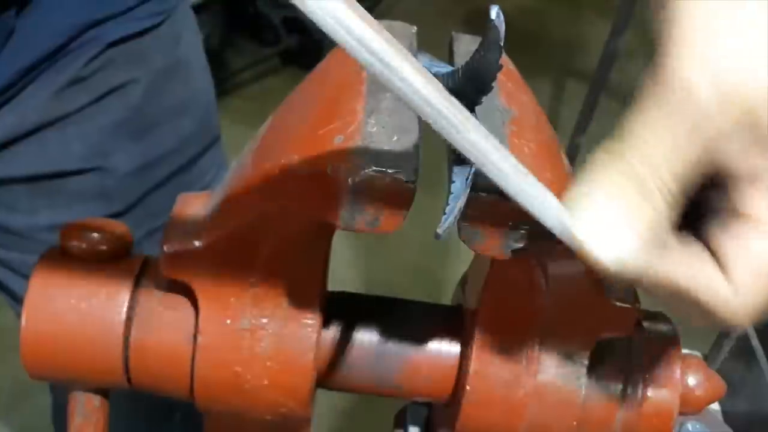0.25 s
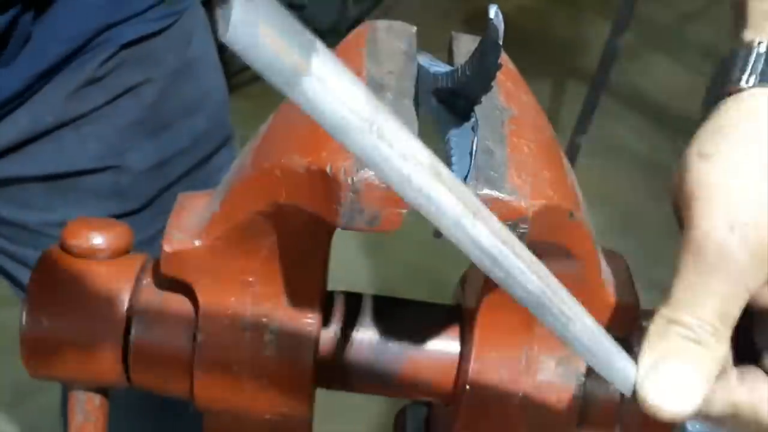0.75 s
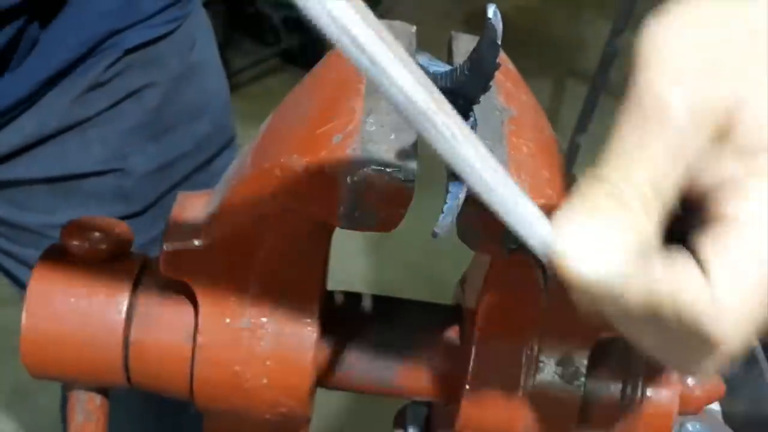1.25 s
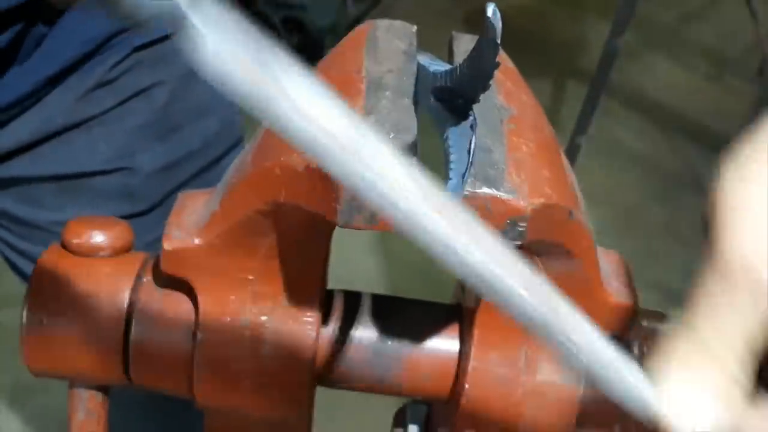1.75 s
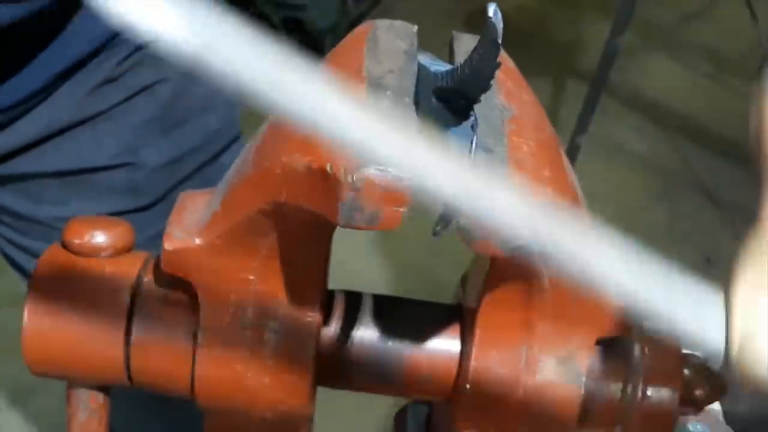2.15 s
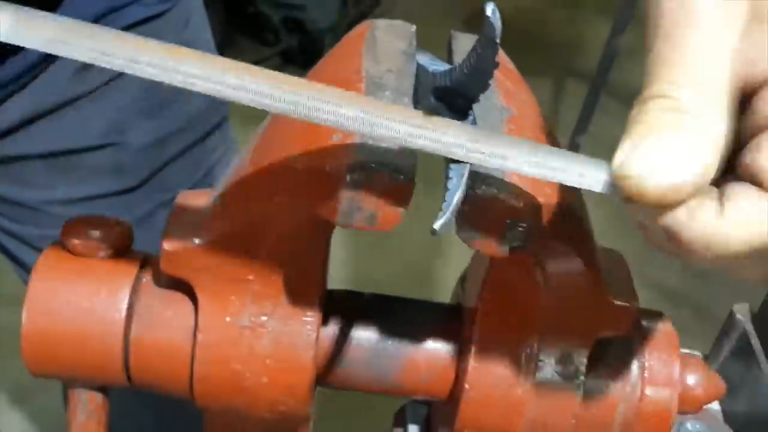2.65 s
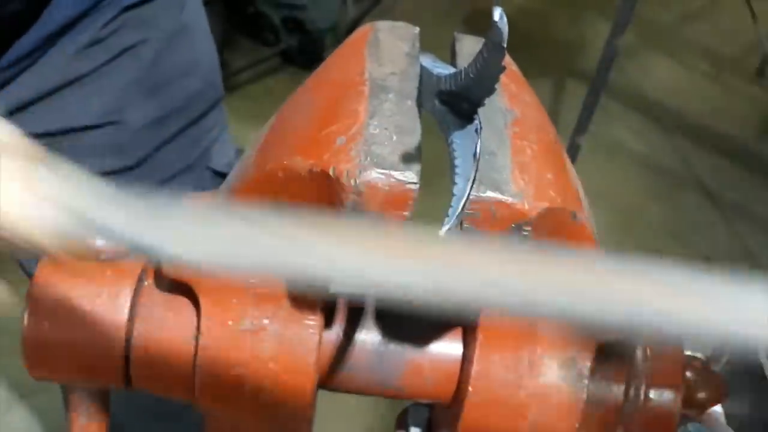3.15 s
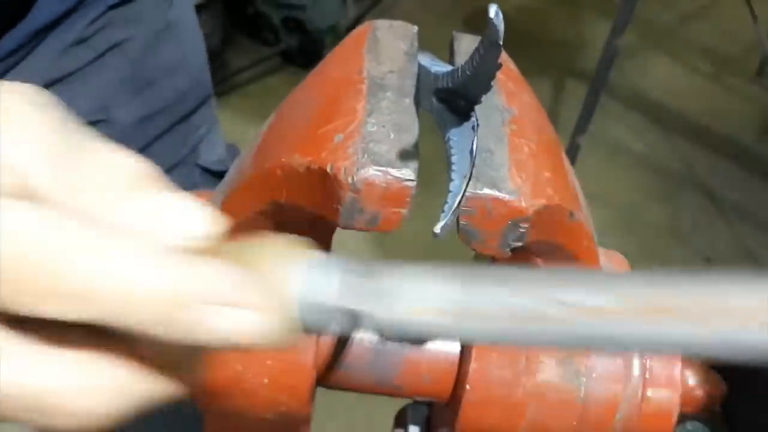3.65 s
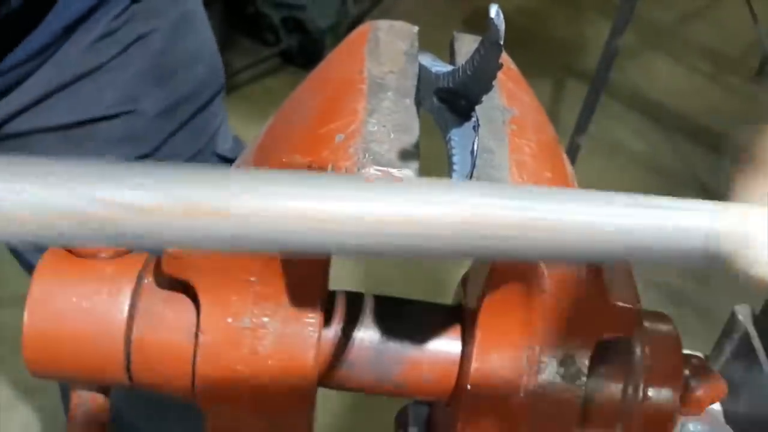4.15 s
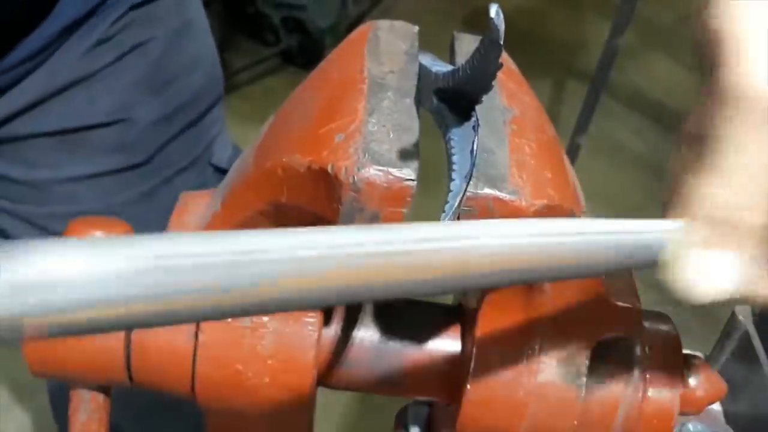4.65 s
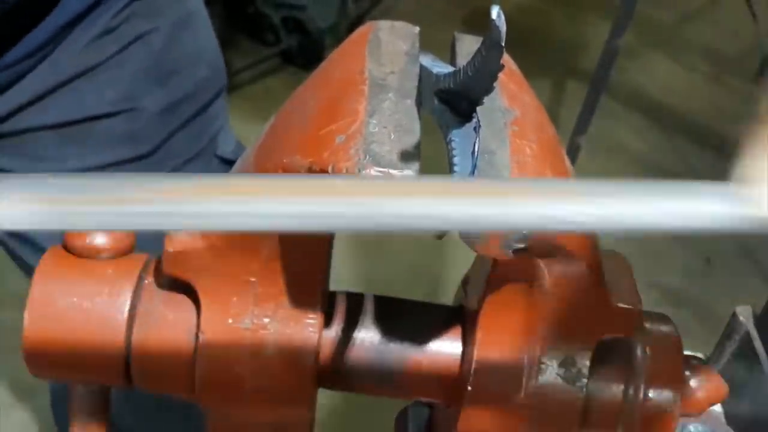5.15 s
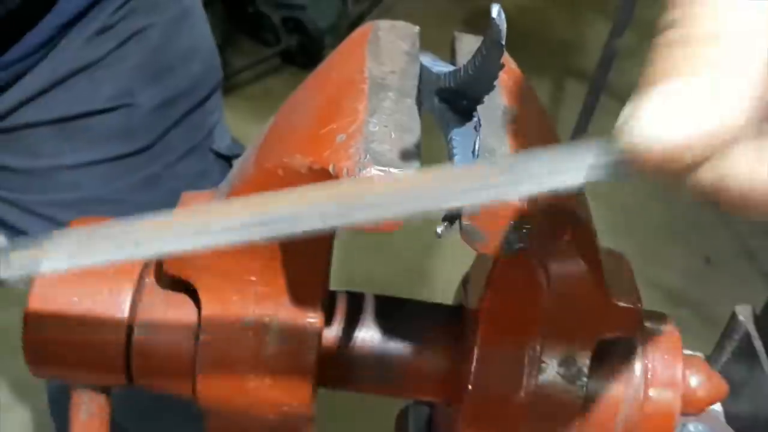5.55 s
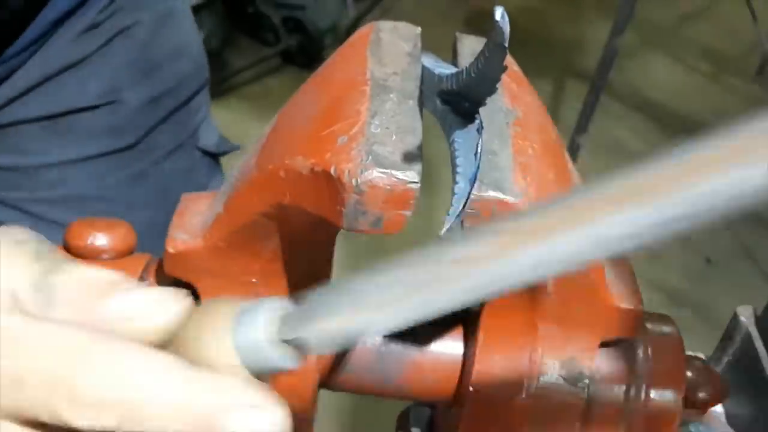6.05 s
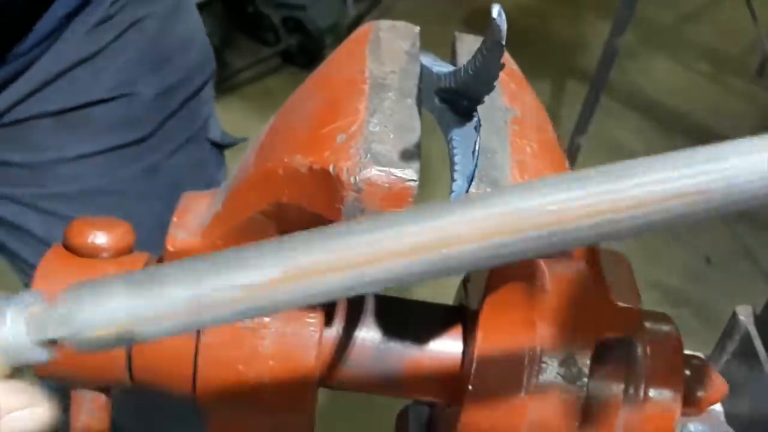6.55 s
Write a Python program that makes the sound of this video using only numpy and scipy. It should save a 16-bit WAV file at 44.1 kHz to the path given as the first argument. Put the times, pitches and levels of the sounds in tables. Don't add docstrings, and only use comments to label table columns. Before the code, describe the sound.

Close, dry workshop sound of a round metal file on a small iron piece in a bench vise, over faint low ventilation hum. From 0.1 to 2 s, a tap and then six strong, gritty forward strokes, peaking near 0.27, 0.64, 0.96, 1.3, 1.6 and 1.93 s, with weaker return scrapes between; bright midrange rasp, ringing chatter and a hard clack at 1.27. From 2.2 to 2.8 s only a tap and faint light scrapes. Thin, piercing squeals near 8 kHz follow at 3.1, 3.5 and 3.9 s, with ticks and soft air thuds. A coarse rasp comes at 4.25, a sharp clack at 4.6, a shorter rasp at 4.9. Another squeal at 5.25; at 5.6 squeal breaks into a loud nasal buzz. A squeal at 5.95, then hissing, buzzing strokes at 6.3 and 6.6 s, the last held longest, fading into short metallic ringing.

```python
import sys
import numpy as np
from scipy import signal
from scipy.fft import rfft, irfft
from scipy.io import wavfile
from scipy.ndimage import uniform_filter1d

SR = 44100
rng = np.random.default_rng(int(sys.argv[2]) if len(sys.argv) > 2 else 0)


def decibels_to_gain(level_db):
    exponent = np.asarray(level_db, float) / 20
    return 10 ** exponent


def digitize_waveform(pressure):
    field = np.atleast_2d(pressure).T
    bounded = np.clip(field, -1, 1)
    quanta = np.round(bounded * 32767).astype(np.int16)
    wavfile.write(sys.argv[1], SR, quanta)


N = 299439

# frequency in Hz, density in dB per Hz.
RASP_SPECTRUM = [(290, -121), (500, -18), (1300, -15.5), (1430, -8), (1780, -4.5), (2940, -9), (3620, 4),
                 (6910, -2.5), (8280, -1.5), (11000, -45), (14300, -59.5), (22000, -120)]


def rms_one(x):
    return x / np.sqrt(np.mean(x ** 2) + 1e-20)


def drift(rate):
    r = np.exp(-2 * np.pi * rate / SR)
    return rms_one(signal.lfilter([1], [1, -2 * r, r * r], rng.standard_normal(N + SR))[SR:])


def coloured(x, spectrum):
    hz = np.fft.rfftfreq(N, 1 / SR) + 1
    points = np.array(spectrum)
    density_db = np.interp(np.log(hz), np.log(points[:, 0]), points[:, 1])
    return rms_one(irfft(rfft(x) * decibels_to_gain(density_db), N))


def resonance(x, hz, width):
    r = np.exp(-np.pi * width / SR)
    return signal.lfilter([(1 - r * r) / 2, 0, (r * r - 1) / 2], [1, -2 * r * np.cos(2 * np.pi * hz / SR), r * r], x)


def bandpass(x, low_hz, high_hz):
    return signal.sosfilt(signal.butter(2, [low_hz, high_hz], "band", fs=SR, output="sos"), x)


def band(x, low_hz, high_hz):
    return rms_one(bandpass(x, low_hz, high_hz))


def steep_band(x, low_hz, high_hz):
    return band(band(x, low_hz, high_hz), low_hz, high_hz)


def tone(hz, level_db, wobble_db, rate):
    return np.sqrt(2) * decibels_to_gain(level_db + wobble_db * drift(rate)) * np.sin(2 * np.pi * np.cumsum(hz) / SR)


def control_times():
    step = 32
    return np.arange(0, N + step, step) / SR


def smooth(control):
    return np.interp(np.arange(N) / SR, control_times(), control)


def shape_db(s, held_s, rise_s, fall_db_s):
    late = control_times() - np.reshape(s, (-1, 1))
    rise_db = -30 * (np.minimum(late, 0) / rise_s) ** 2
    return rise_db - fall_db_s * np.maximum(late - np.reshape(held_s, (-1, 1)), 0)


def let_go_db(s, held_s, drop_db, drop_s):
    return np.maximum(shape_db(s, held_s, np.inf, drop_db / drop_s), -drop_db)


def lead(rows, under_db):
    hz, one_db, two_db = np.transpose(rows)[2:]
    top = np.argmax(under_db + np.maximum(one_db, two_db)[:, None], axis=0)
    down_db = np.maximum(under_db[top, np.arange(len(top))], -150)
    return smooth(hz[top]), smooth(one_db[top] + down_db), smooth(two_db[top] + down_db)


def split(x, edge_hz):
    low = 1 / (1 + (np.fft.rfftfreq(N, 1 / SR) / edge_hz) ** 8)
    return [rms_one(irfft(rfft(x) * share, N)) for share in (low, 1 - low)]


def patchy(x, edges_hz):
    total = np.zeros(N)
    for low_hz, high_hz in zip(edges_hz, edges_hz[1:]):
        total += decibels_to_gain(1.6 * drift(18)) * bandpass(x, low_hz, high_hz)
    return rms_one(total)


def rung(drive, modes, least_width, swell_rate):
    total = np.zeros(N)
    for k, (hz, width, db) in enumerate(modes):
        width = max(width, least_width)
        swell = decibels_to_gain(3.8 * np.minimum(drift(swell_rate), 1.4))
        total += (-1) ** k * swell * decibels_to_gain(db) * resonance(drive, hz, width) * np.sqrt(SR / width)
    return total


def shop_hum():
    # frequency in Hz, density in dB per Hz.
    shop_spectrum = [(15, -60), (40, -26.5), (100, -9.5), (228, 2), (320, -3), (440, -16), (1980, -25.5),
                     (3300, -21.5), (3980, -17), (5650, -27), (12500, -37), (14600, -32), (15800, -29)]
    air = rng.standard_normal(N)
    rumble = decibels_to_gain(-43 + 0.13 * drift(1.2)) * coloured(air, shop_spectrum)
    fan = decibels_to_gain(-52.5) * rms_one(resonance(air[::-1], 225, 27))
    vise_hum = tone(np.full(N, 734), -70.5, 4.3, 9.9)
    return rumble + fan + vise_hum


def taps():
    # start in seconds, peak in dB, ring in Hz.
    touches = [(0.1038, -7, 4050), (0.5152, -24, 4700), (0.592, -25, 4900), (1.274, 8.5, 4930),
               (3.506, -16, 5140), (5.567, -21.5, 4890), (5.927, -30, 3816), (2.228, -7.5, 3750),
               (3.476, -13, 3560), (3.8395, -6.5, 4970), (4.1861, -14, 4880), (4.4784, -23, 4000),
               (4.614, 5, 3950), (4.843, -11.5, 5070), (5.18, -28, 4756), (6.489, -21, 4170)]
    out = np.zeros(N)
    t = np.arange(2000) / SR
    cracks = coloured(rng.standard_normal(N), RASP_SPECTRUM)
    for s, db, hz in touches:
        at = round(s * SR)
        crack = cracks[at:at + 2000] * np.exp(-t / 0.0017)
        ring = np.sin(2 * np.pi * hz * t) * np.exp(-t / .003)
        out[at:at + 2000] += decibels_to_gain(db) * (0.095 * crack + 0.34 * ring)
    return out


def pressure():
    # full at in seconds, held in seconds, bite in dB,
    # then dull rasp and filings hiss in dB relative to the bite.
    pushes = [(0.267, 0.059, -11.5, -4.5, -14), (0.639, 0.038, -9.5, -5, -11.5),
              (0.964, 0.044, -11.5, -9, -7.5), (1.294, 0.049, -11.5, -7, -10),
              (1.606, 0.056, -9.5, -10.5, -12.5), (1.924, 0.064, -13.5, -6, -8), (2.71, 0.018, -34, -5, -5),
              (2.758, 0.033, -27.5, 0.5, -1.5), (4.244, 0.061, -12.5, -0.5, -11),
              (4.909, 0.054, -18.5, -5, -14), (5.63, 0.07, -19, -6, 3), (6.272, 0.05, -19, -5.5, -2),
              (6.574, 0.082, -17.5, -1, 5)]
    returns = [(0.201, 0.026, -32.5, -3.5, -35), (0.447, 0.047, -23.5, -8, -42),
               (.525, 0.0093, -31.5, -32, -35), (0.808, 0.045, -17.5, -16.5, -38),
               (1.132, 0.038, -20.5, -13, -29), (1.47, 0.022, -16.5, -23, -22),
               (1.785, 0.032, -21, -10.5, -29), (2.339, 0.05, -30.5, -9, -13),
               (2.514, 0.11, -34.5, -2, -10)]
    catches = [(.105, 0.057, -35.5, -26, -40), (0.592, 0.014, -16, -23, -35),
               (2.229, 0.0043, -30.5, -29, -32), (2.396, 0.033, -25.5, -5, -8.5),
               (4.187, 0.016, -92.5, -38, -35), (4.614, 0.005, -15, -5.5, -19),
               (4.843, 0.011, -72.5, -9, -17), (6.489, 0.012, -21.5, -9, -15)]
    skids = [(3.071, 0.08, -34.5, 4.9, 6.7), (3.466, 0.078, -35.5, 5, 11.8), (3.837, 0.074, -32, 3.3, 16),
             (5.181, 0.13, -34.5, 6.9, 11.4), (5.566, 0.034, -39, 6.6, 7.2),
             (5.928, 0.079, -31.5, 4.4, 11.5)]
    # strokes, rise in s, fall in dB/s, vise ring in dB, brightness lost away from top speed in dB/s,
    # top speed as share of hold, share that rings the iron in dB, even scrape in dB under the bite.
    kinds = [(pushes, .046, 244, -6, 74.5, 3.5, 0, -12),
             (returns, .036, 400, 2.2, 46, 0.67, 0, -9),
             (catches, .003, 243, 0.92, 21, 6.2, -2, -9),
             (skids, .005, 97, -2, 221.5, 1.23, -12, -0.5)]
    dullest_db, dull_follows = -46, 0.61
    gains = 0
    for rows, rise_s, fall_db_s, vise_db, dimming, share, ringing_db, even_db in kinds:
        s, held_s, bite_db, dull_db, hiss_db = np.transpose(rows)[:, :, None]
        bite = decibels_to_gain(bite_db + shape_db(s, held_s, rise_s, fall_db_s))
        slow_db = np.maximum(-dimming * np.abs(control_times() - s - share * held_s), dullest_db)
        layers_db = [ringing_db, dull_db + dull_follows * slow_db, hiss_db + slow_db, vise_db, even_db]
        gains = gains + np.sum([bite * decibels_to_gain(db) for db in layers_db], axis=1)
    return [smooth(gain) for gain in gains]


def snags():
    # start in seconds, peak in dB, ring in Hz, extra pressure in dB.
    bursts = [(0.254, -1, 4840, -6), (0.27, 5.5, 4610, 3), (0.3324, 3, 4970, 1), (0.443, 0.5, 3930, 8),
              (0.515, -4, 4300, -2), (0.5234, -5, 4470, 6), (0.617, 6, 4010, 4), (0.6348, 7.5, 4300, -3),
              (0.7976, -5, 3740, 1.5), (0.9264, -9, 4170, 4), (0.9502, -6, 4132, -1), (0.975, 0, 4030, 5),
              (1.119, -5, 5120, 0), (1.1434, -1, 3950, 9.5), (1.292, -12, 4150, 7), (1.4665, 1, 3880, 7.5),
              (1.578, -4, 4126, 0), (1.5936, -5, 4150, -6), (1.7906, -10, 3920, 3), (1.8973, -12, 4200, 1),
              (1.9086, -2, 3880, 0), (2.32, -16, 4470, 4.5), (3.5139, -9, 5020, 6), (3.5457, -10, 3190, 3),
              (4.222, 1.5, 4940, -12), (4.245, 5, 3860, -0.5), (4.2877, 7, 4840, 1), (4.3073, 3, 4780, 1),
              (4.8846, -14, 4343, -12), (4.903, -5.5, 4190, 1), (5.5933, -9, 3730, 2),
              (5.6261, -9, 3720, -2.5), (6.0033, -6, 4800, 4), (6.2219, -27, 3790, 13),
              (6.2477, -14, 3700, 1), (6.3044, -6, 3680, 2.5), (6.3537, -11, 3650, 7),
              (6.5086, -5.5, 4380, -4), (6.548, -9, 4280, 3.5), (6.31, 0, 3640, 4), (5.628, -7.5, 4880, 5),
              (5.715, -8, 4390, 8), (6.6194, -5, 3530, 9)]
    s, db, hz, push_db = np.transpose(bursts)[:, :, None]
    late = control_times() - s
    stall = -0.64 * np.exp(-np.abs(late) / 0.0016)
    surge = np.where(late > 0, np.exp(-np.abs(late) / 0.0098), stall)
    t = np.arange(3000) / SR
    notes = decibels_to_gain(db - 7.5) * np.sin(2 * np.pi * hz * t) * np.exp(-t / 0.0064) * np.minimum(t / .001, 1)
    rings = np.zeros(N + 3000)
    for at, note in zip((s[:, 0] * SR).astype(int), notes):
        rings[at:at + 3000] += note
    return decibels_to_gain(smooth(np.sum(push_db * surge, axis=0))), rings[:N]


def rasp():
    # frequency in Hz, width in Hz, level in dB.
    iron = [(3230, 27, -31), (3602, 47, 7.5), (3954, 150, 18), (4240, 100, 12.5), (4423, 33, 17),
            (4443, 460, 21.5), (4940, 310, 20.5), (5185, 20, 17), (5530, 290, 3), (5660, 77, -27.5),
            (6800, 200, -35), (8050, 40, -26), (12400, 51, -9), (8340, 137, -17)]
    vise_modes = [(743.8, 9, -6), (914.7, 30, -4), (1151.5, 16, -8), (1487.4, 14, 0), (2035, 12, -5),
                  (2230, 60, 1), (2443, 16, -3), (2740, 30, -4), (2908, 14, -6)]
    # frequency in Hz, density in dB per Hz.
    hiss_spectrum = [(8000, 9), (9500, 0), (11400, -14.5), (13500, -0.5), (15200, -8), (17000, -7)]
    # full at in seconds, level in dB.
    rubs = [(.3, -30), (.45, -37.5), (0.661, -14), (.8, -30), (1.0, -20.5), (1.13, -35), (1.303, -16.5),
            (1.47, -32), (1.6, -23), (1.93, -45), (2.39, -27), (2.601, -41), (4.26, -23.5), (4.625, -64),
            (4.921, -29.5), (6.572, -17)]
    bite, dull_gain, hiss_gain, vise_gain, even_gain = pressure()
    surge, rings = snags()

    sizes = decibels_to_gain(1.7 * np.minimum(rng.exponential(1, N), 4)) * rng.choice([-1, 1], N)
    struck = rng.random(N) < 5500 / SR
    bites = rms_one(sizes * struck * decibels_to_gain(3.0 * drift(110)))

    ringing = rms_one(rung(bites, iron, 110, 20.3))
    breaking = patchy(coloured(bites, RASP_SPECTRUM), np.geomspace(400, 12000, num=9))
    dull, middle = split(ringing + decibels_to_gain(-9.0) * breaking, 3220)
    filings = coloured(.6 * bites + rng.standard_normal(N), hiss_spectrum)
    hiss = patchy(filings, np.arange(8000, 18000, 1200))
    scrape = band(steep_band(rng.standard_normal(N), 3100, 5630), 3080, 5600)
    even = patchy(scrape, np.geomspace(2500, 6500, num=7))

    vise = rung(decibels_to_gain(-27.5) * vise_gain * bites, vise_modes, 5, 23)
    s, db = np.transpose(rubs)
    rub_gain = smooth(decibels_to_gain(db) @ decibels_to_gain(shape_db(s, 0.0059, 0.009, 251)))
    high = rms_one(resonance(bites, 8050, 140) - resonance(bites, 8310, 131)) * rub_gain
    return surge * (bite * middle + dull_gain * dull + hiss_gain * hiss + even_gain * even) + vise + high + rings


def file_ring():
    # frequency in Hz, width in Hz, level in dB.
    middle_modes = [(2950, 20, -12), (3140, 30, 0), (3680, 22, -4), (4010, 30, -1), (4250, 25, -5),
                    (4740, 25, 2), (5110, 25, -5), (5320, 25, -4), (6460, 40, -10)]
    top_modes = [(9320, 25, -4), (9500, 20, 4), (10100, 25, -5), (10480, 20, -10), (11400, 20, -7),
                 (11800, 25, -12), (12800, 30, -13), (14000, 35, -8), (14800, 45, -2)]
    _, _, hiss_gain, _, even_gain = pressure()
    scrape = rng.standard_normal(N)
    middle = rung(decibels_to_gain(-15) * even_gain * scrape, middle_modes, 5, 17.6)
    return middle + rung(decibels_to_gain(-19) * hiss_gain * scrape, top_modes, 5, 18)


def pings():
    # start in
    # seconds, held in seconds, frequency in Hz, level in dB, t60 in seconds.
    mode_pings = [(1.94, 0.025, 2830, -22.5, 0.11), (1.94, 0.017, 5660, -8, 0.13),
                  (1.94, 0.017, 7150, -25, 0.092), (2.236, 0.021, 2430, -48, .14),
                  (2.392, 0.06, 896, -44, 0.083), (2.41, .02, 9550, -45, 0.15),
                  (2.5, 0.14, 2222, -43.5, .4), (2.74, 0.059, 9600, -37.5, 0.31),
                  (2.78, 0.034, 1746, -39, 0.11), (3.16, 0.033, 9600, -47, 0.2),
                  (3.545, 0.018, 3240, -31, 0.1), (3.939, 0.016, 3994, -30, 0.14),
                  (3.95, 0.02, 3110, -37.5, 0.11), (4.219, .02, 3380, -26, 0.075),
                  (4.3, 0.024, 2205, -24, 0.11), (.69, 0.022, 4300, -22, 0.068),
                  (1.469, 0.021, 5530, -25.5, 0.059), (6.04, 0.014, 4800, -27, 0.2),
                  (4.45, 0.092, 1975, -55, .2), (4.31, 0.05, 1345, -34.5, .15), (.25, 0.019, 848, -31, .06),
                  (.285, 0.045, 1000, -37.5, .08), (.24, 0.08, 2500, -32.5, .1),
                  (.31, 0.053, 2057, -29, .1), (1.14, 0.074, 1990, -41, .1), (3.775, 0.021, 3550, -46, .04),
                  (3.775, 0.021, 1240, -50, .04), (6.32, 0.036, 3570, -19.5, .12),
                  (6.6, 0.069, 3560, -23, .12), (3.53, 0.042, 11400, -52, .2),
                  (3.87, 0.053, 15000, -31.5, .17), (3.94, 0.043, 11430, -50.5, .26),
                  (4.215, 0.074, 1710, -29.5, .1), (4.641, 0.047, 1328, -36, .15),
                  (5.33, 0.056, 9700, -49, 0.27), (3.54, .04, 9320, -46, .25), (3.55, .03, 10480, -52, .25),
                  (3.95, .03, 10150, -47, .2), (6.0, .06, 11500, -52, 0.17), (5.97, 0.09, 10270, -48, 0.25),
                  (5.99, 0.033, 15000, -32, 0.14), (6.0, 0.075, 3216, -37, 0.13),
                  (6.488, 0.024, 1350, -35, 0.17), (6.57, 0.11, 2220, -30, 0.047),
                  (1.2, .02, 6000, -36, .06), (0.36, 0.082, 2500, -40, .15), (1.1, 0.028, 3100, -39, .12),
                   (1.5, 0.024, 2600, -37, .12), (4.6, 0.027, 1450, -40, .05), (6.6, .02, 1800, -40, .05),
                   (0.75, 0.064, 1300, -43, 0.18), (1.459, 0.077, 1205, -45, 0.15),
                  (.44, 0.05, 1505, -44, .15), (.8, 0.11, 1497, -42, 0.19), (1.02, 0.047, 1420, -34, .12),
              (1.11, 0.099, 1510, -37, 0.13), (1.33, 0.043, 1415, -39.5, 0.16),
              (1.455, 0.087, 1520, -34.5, 0.22), (1.78, .07, 1505, -40.5, .15),
              (3.09, .03, 4000, -36.5, .1), (5.205, .02, 3220, -42, .05), (5.19, .025, 1440, -40.5, .05)]
    out = np.zeros(N)
    t = np.arange(SR // 2) / SR
    for s, held_s, hz, db, t60 in mode_pings:
        shape = np.clip(t / 0.0084, 0, 1) * decibels_to_gain(db - 60 * np.maximum(t - held_s, 0) / t60)
        note = np.sqrt(2) * shape * np.sin(2 * np.pi * hz * t)
        at = round(s * SR)
        out[at:at + len(t)] += note[:N - at]
    return out * decibels_to_gain(4.0 * drift(60))


def tip_chatter():
    # full at in seconds, held in seconds, third overtone in Hz, its level in dB, fundamental in dB.
    chatters = [(.28, 0.058, 4350, -23.5, -26), (0.636, 0.046, 4202, -18, -30),
                (0.967, 0.016, 4086, -12, -23.5), (.705, 0.03, 4250, -20, -43),
                (1.04, 0.019, 4210, -21, -36), (1.365, 0.028, 4300, -22, -43),
                (1.296, 0.02, 4132, -10, -30), (1.612, 0.038, 4230, -12.5, -29),
                (1.939, 0.049, 4247, -12, -32), (4.244, 0.095, 4053, -21, -34.5),
                (4.917, 0.031, 4090, -17, -28)]
    # multiple of the pitch, level in dB under the third.
    overtones = [(2, -22), (4, -14), (5, -30)]
    s, held_s = np.transpose(chatters)[:2]
    third_hz, third_db, first_db = lead(chatters, shape_db(s, held_s, .04, 213))
    pitch = third_hz / 3 * (1 + .009 * drift(90))
    stack = tone(pitch, first_db - 2.5, 3.0, 30) + tone(3 * pitch, third_db, 4.0, 40)
    for k, db in overtones:
        stack += tone(k * pitch, third_db + db, 4.5, 38)
    return stack


def puffs():
    # middle in seconds, length in seconds, level in dB.
    gust_rows = [(0.628, 0.019, -18), (0.981, 0.034, -31.5), (1.307, 0.046, -24.5), (3.156, 0.037, -29),
                 (3.513, 0.02, -22.5), (3.544, 0.045, -27), (3.87, 0.098, -36.5), (3.912, 0.026, -15),
                 (3.933, 0.052, -18.5), (5.256, 0.064, -33.5), (5.289, 0.023, -21), (5.326, 0.027, -22.5),
                 (6.028, 0.051, -31), (6.333, 0.049, -44)]
    t = np.arange(N) / SR
    kicks = rng.standard_normal(N) * (rng.random(N) < 350 / SR)
    jumps = band(signal.lfilter([1], [1, -.93], kicks), 110, 4000)
    air = rng.standard_normal(N)
    swings = steep_band(air, 90, 360) * decibels_to_gain(2.0 * drift(40))
    swings = swings / np.sqrt(uniform_filter1d(swings ** 2, size=900) + .1)
    gusts = sum(decibels_to_gain(db) * np.clip(1.5 - 3 * np.abs(t - s) / length, 0, 1) for s, length, db in gust_rows)
    body = decibels_to_gain(-10.5) * band(air, 400, 1600)
    thud = decibels_to_gain(-9) * steep_band(air, 50, 137)
    return gusts * (.8 * swings + .7 * jumps + body + thud)


def thumps():
    # middle in seconds, length in seconds, frequency in Hz, level in dB.
    swing_rows = [(3.155, 0.053, 110, -30), (3.513, 0.038, 120, -24), (3.545, 0.046, 110, -21),
                  (3.92, 0.057, 242, -25), (5.29, 0.033, 130, -25), (5.325, 0.037, 110, -27),
                  (1.304, .04, 120, -32)]
    out = np.zeros(N)
    t = np.arange(N) / SR
    for s, length, hz, db in swing_rows:
        window = np.clip(1 - 2 * np.abs(t - s) / length, 0, 1)
        out += decibels_to_gain(db) * np.sin(2 * np.pi * hz * (t - s)) * window
    return out


def squeal():
    # full at in seconds, held in seconds, pitch in Hz, level in dB, lower combination tone in dB.
    squeals = [(2.745, 0.05, 8100, -29, -36.5), (3.086, 0.0095, 8250, -36, -45),
               (3.104, 0.012, 8130, -21.5, -33), (3.125, 0.035, 8120, -13.5, -37),
               (3.485, 0.077, 8190, -11, -36), (3.854, 0.024, 8254, -9.5, -29),
               (3.889, 0.0322, 8320, -11, -24), (3.925, 0.041, 8130, -14, -27.5),
               (5.223, .005, 7900, -34, -29), (5.237, 0.098, 8137, -12.5, -39),
               (5.581, 0.0043, 8400, -25, -41), (5.598, 0.0223, 8410, -13.5, -18),
               (5.63, 0.067, 8310, -21.5, -28.5), (5.944, 0.096, 8430, -12.5, -20),
               (6.246, 0.012, 8350, -15, -21), (6.31, 0.0091, 8150, -15.5, -45)]
    s, held_s = np.transpose(squeals)[:2]
    under_db = shape_db(s, held_s, .011, 165) + let_go_db(s, held_s, 8, 0.021)
    hz, level_db, lower_db = lead(squeals, under_db)
    pitch = hz * (1 + .0022 * drift(70))
    waver_db = np.clip((-15 - level_db) / 2, .6, 4)
    dying = (waver_db - .6) / 3.4
    out = tone(pitch, level_db - 3 * dying, waver_db, 60)
    out += tone(pitch * 1.011, level_db - 22, 3.0, 30)
    out += tone(6560 * (1 + .004 * drift(50)), lower_db - 3.5, 3.0, 35)
    out += tone(pitch + 1840, lower_db - 18.5, 4.7, 44)
    skirt = decibels_to_gain(level_db - 23 + 15 * dying) * steep_band(rng.standard_normal(N), 7950, 8500)
    octave = decibels_to_gain(level_db - 27) * steep_band(rng.standard_normal(N), 14300, 16200)
    return out + skirt + octave


def root_chatter():
    # full at in seconds, held in seconds, pitch in Hz, fundamental in dB, second overtone in dB.
    chatters = [
        (3.902, 0.02, 1833, -32, -49),
        (3.945, 0.064, 1810, -38.5, -50),
        (5.277, 0.0099, 1905, -30, -65),
        (5.634, 0.032, 1830, -19, -13),
        (5.675, 0.02, 1840, -17, -15.5),
        (5.71, .015, 1826, -23, -16.5),
        (6.005, 0.021, 1845, -25, -63),
        (6.278, 0.028, 1834, -18, -16),
        (6.582, 0.072, 1813, -25, -19.5),
    ]
    # multiple of the pitch, level in dB under the second.
    overtones = [(3, -9.5), (4, -14), (5, -30)]
    s, held_s = np.transpose(chatters)[:2]
    under_db = shape_db(s, held_s, .04, 150) + let_go_db(s, held_s, 11, 0.021)
    hz, first_db, second_db = lead(chatters, under_db)
    pitch = hz * (1 + .005 * drift(50))
    stack = tone(pitch, first_db, 3.0, 45) + tone(2 * pitch, second_db, 4.0, 70)
    for k, db in overtones:
        stack += tone(k * pitch, second_db + db, 6.7, 60)
    return stack


def room(x):
    t = np.arange(SR // 2) / SR
    tail = rng.standard_normal(SR // 2) * decibels_to_gain(-60 * t / .22) * (t > .004)
    return signal.fftconvolve(x, tail / np.sqrt(np.sum(tail ** 2)))[:N]


def scene():
    work = taps() + rasp() + pings() + tip_chatter() + squeal() + root_chatter()
    return (shop_hum() + work + decibels_to_gain(-15) * room(work) + file_ring() + puffs() + thumps())[None]


def band_limit(x):
    return signal.sosfilt(signal.butter(12, 15910, fs=SR, output="sos"), x)


def record(dry):
    # middle in seconds, length in seconds, depth in dB.
    dropouts = [(.505, .014, -9), (1.212, .016, -9), (1.96, .012, -6), (2.256, .014, -10), (2.62, .012, -9),
                (3.487, .012, -24), (3.79, .026, -10), (4.234, .008, -17), (4.435, .02, -7),
                (4.875, .02, -8), (5.2, .02, -20), (5.25, .01, -7), (5.305, .012, -10), (5.265, .008, -7),
                (6.158, .024, -14), (6.285, .01, -5), (6.35, .008, -6), (6.605, .01, -4), (2.99, .09, -4)]
    t = np.arange(N) / SR
    dip_db = sum(db * np.clip(3 - 6 * np.abs(t - s) / length, 0, 1) for s, length, db in dropouts)
    spared = signal.sosfiltfilt(signal.butter(2, 600, fs=SR, output="sos"), dry)
    spared = spared + signal.sosfiltfilt(signal.butter(2, [7800, 8700], "band", fs=SR, output="sos"), dry)
    dipped = spared + decibels_to_gain(dip_db) * (dry - spared)
    rounded = .85 * np.tanh(dipped / .85)
    finished = signal.sosfilt(signal.cheby2(16, 60, 16450, fs=SR, output="sos"), rounded)
    return band_limit(finished)


dry = scene()
out = record(dry)
digitize_waveform(out)
```